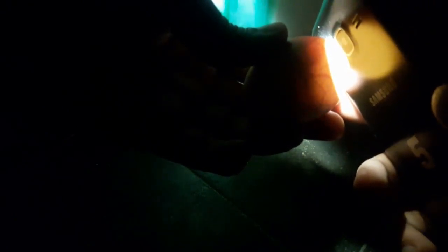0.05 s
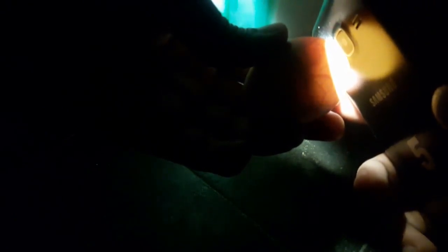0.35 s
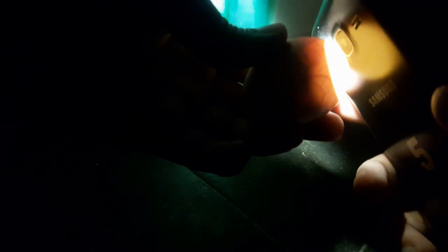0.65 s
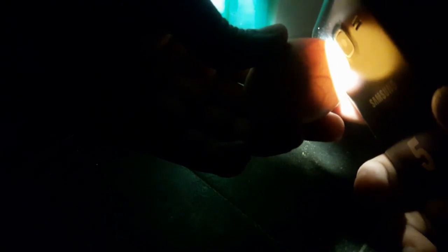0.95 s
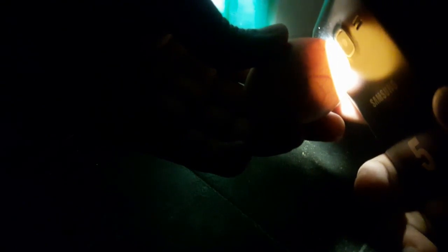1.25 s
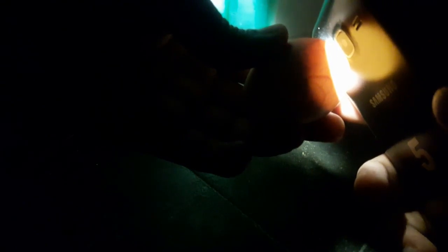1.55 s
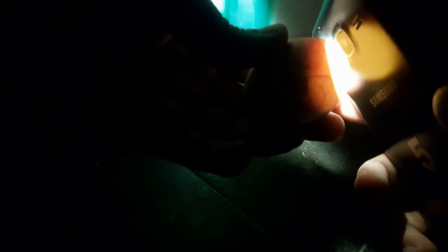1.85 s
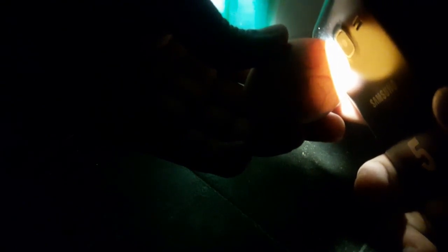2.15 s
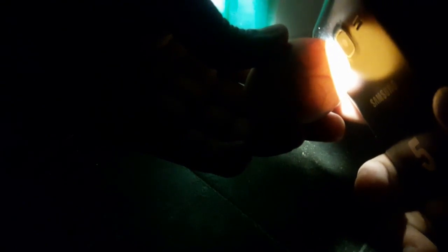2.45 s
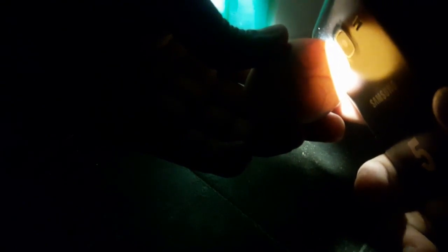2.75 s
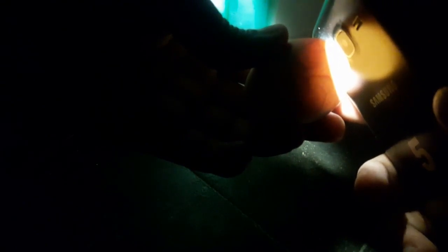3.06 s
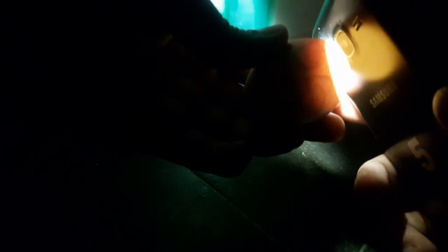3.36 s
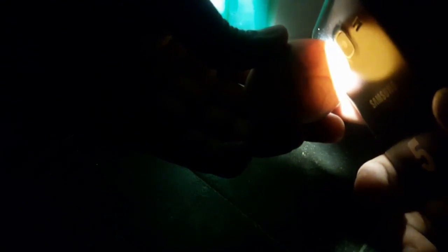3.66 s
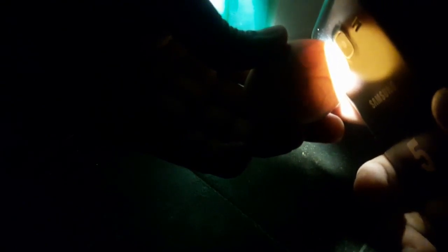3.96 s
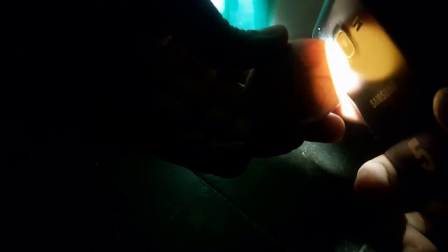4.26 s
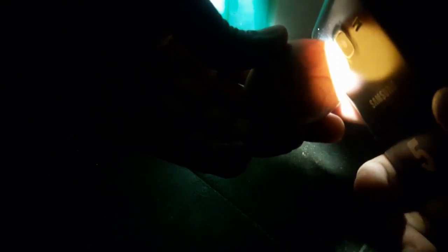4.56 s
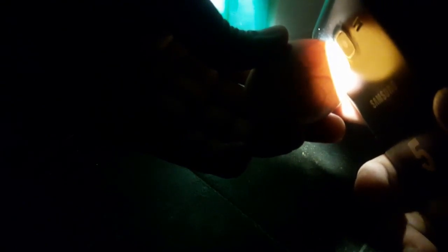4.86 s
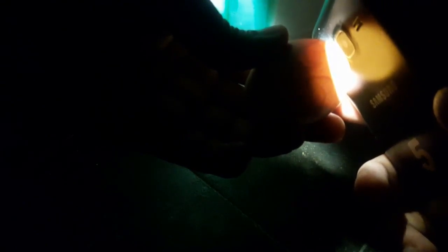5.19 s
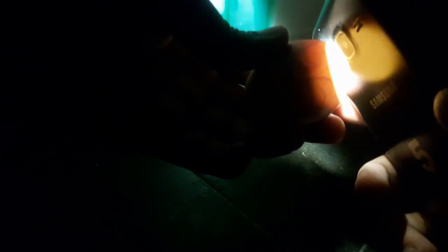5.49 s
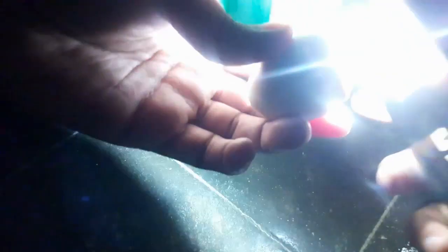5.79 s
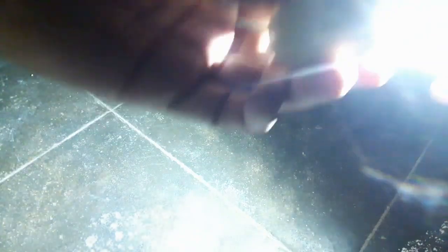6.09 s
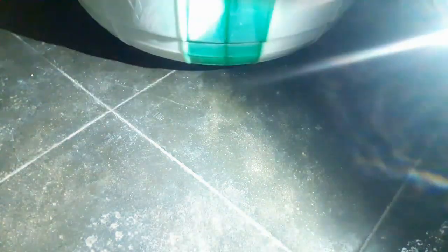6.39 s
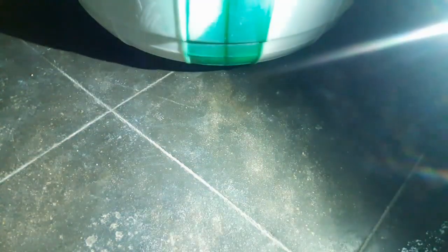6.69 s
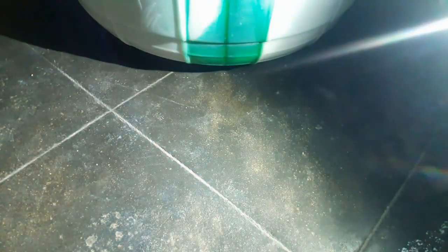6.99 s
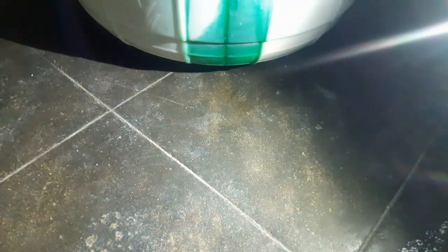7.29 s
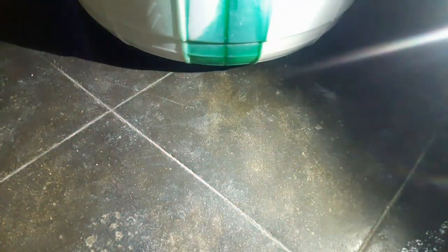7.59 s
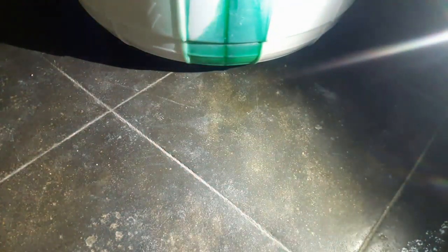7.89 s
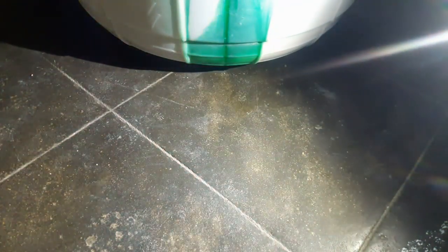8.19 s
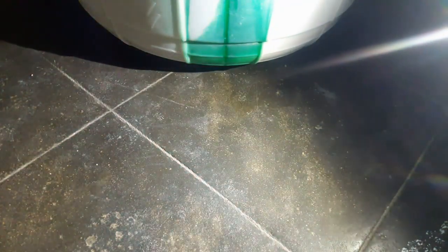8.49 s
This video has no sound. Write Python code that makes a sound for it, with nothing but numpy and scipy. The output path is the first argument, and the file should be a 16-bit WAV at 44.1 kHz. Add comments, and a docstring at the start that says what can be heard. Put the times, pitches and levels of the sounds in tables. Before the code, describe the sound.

A chick cries a run of loud, high, falling chirps, about three a second, ringing off bare tiles. After about four seconds the cries stop and softer peeps, rising whistles and faint twitter from several chicks overlap, mostly farther away. Close to the microphone, hands moving a lamp make soft bumps and a faint rustle. A fan or motor hums quietly throughout.

```python
"""Chicks in a tiled room

A chick cries thirteen loud falling chirps, each a nearly pure whistle of the syrinx ringing off bare tiles.
Softer calls then overlap, as from several chicks, most farther from the microphone: low sagging peeps, thin
plunging ones, rising whistles and short held notes over a faint twitter. An electric fan or motor hums
behind them; close to the microphone, hands moving a lamp make soft bumps and a faint rustle."""
import sys
import numpy as np
from scipy import signal
from scipy.fft import rfft, irfft
from scipy.io import wavfile
from scipy.ndimage import uniform_filter1d

SR = 44100
rng = np.random.default_rng(int(sys.argv[2]) if len(sys.argv) > 2 else 0)


def master(y):
    """Save y as 16-bit WAV."""
    cut = np.clip(np.atleast_2d(y).T, -1, 1)
    pcm = np.round(cut * 32767)  # scale
    wavfile.write(sys.argv[1], SR, pcm.astype(np.int16))


N = 381024
TIME = np.arange(N) / SR

# steady lines of the motor (frequency [Hz], level [dB])
MOTOR_LINES = [(98.2, -69), (119.8, -70.5), (160.2, -77), (165.5, -71), (189.1, -66.5), (196.5, -56.5),
               (236.2, -60.5), (276.6, -73.5), (284.0, -74), (378.2, -65.0), (392.3, -77), (567.3, -70.5),
               (662.1, -75.5), (785.3, -72.5)]
# moving air and microphone hiss (frequency [Hz], density [dB per Hz])
AIR_SPECTRUM = [(38, -102), (62, -85), (125, -86.5), (185, -80), (280, -85), (440, -90), (720, -86),
                (1100, -97), (2200, -100), (5000, -110), (8200, -127), (11500, -119), (15500, -117)]
# likeness of left and right at the microphone (frequency [Hz], coherence [0-1])
COHERENCE = [(100, .99), (300, 0.99), (700, 0.92), (1300, 0.81), (2500, 0.62), (5000, 0.64), (12000, 1)]
# colour of skin and cloth rubbing (frequency [Hz], relative level [dB])
RUSTLE_SPECTRUM = [(100, -32), (290, 17.5), (420, -6.5), (700, 0), (1200, 2), (2200, -6), (5000, -10.5),
                   (9000, -27.5)]
# steady rustle of the hands (time [s], level [dB])
HAND_FIDGET = [(0, -61.5), (3.4, -61.5), (3.9, -59), (5.1, -61.5), (6.0, -59), (8.0, -62.5), (8.64, -66)]
# brushes of skin and sleeve (middle [s], length [s], level [dB])
HAND_STROKES = [(3.624, 0.038, -53.5), (4.38, 0.071, -53), (5.57, 0.33, -57), (6.654, 0.082, -56.5),
                (6.826, 0.13, -60.5), (7.868, 0.44, -57.5)]
# fingers knocking the lamp (time [s], peak [dB], centre [Hz])
LAMP_BUMPS = [(3.857, -41.5, 604), (3.859, -42.5, 316), (3.984, -42, 282), (4.533, -50, 920),
              (4.722, -40.5, 277), (5.343, -48, 537), (5.56, -44, 714), (5.773, -49, 322),
              (6.642, -45, 287), (6.817, -44, 1010), (6.82, -45.5, 545)]
# ring of the tiled room (frequency [Hz], time to fall 60 dB [s])
ROOM_DECAY = [(300, 0.058), (2500, 0.51), (4000, 0.54), (6600, 0.46), (12000, 0.15)]
# bouts of twitter from farther chicks (start [s], end [s], level [dB])
TWITTER_BOUTS = [(4.11, 5.7, -62.5), (6.546, 8.05, -61.5)]
# short held notes (time [s], length [s], level [dB], top pitch [Hz])
HELD_NOTES = [(2.504, .08, -53.5, 4480), (2.868, .045, -52.5, 5450), (4.158, .05, -54.5, 5460),
              (4.449, 0.041, -48.5, 5240), (4.556, 0.0497, -56, 5190), (4.595, 0.061, -54, 4515),
              (4.652, 0.057, -54, 5430), (4.73, 0.038, -51.5, 5700), (5.027, 0.046, -60.5, 5460),
              (5.346, 0.048, -48.5, 4710), (5.935, 0.037, -49.5, 5020), (6.56, .05, -59, 4840),
              (6.7, 0.067, -62, 4680), (6.853, 0.045, -56, 5160), (6.958, 0.065, -59, 5180),
              (7.406, 0.044, -58.5, 4950), (7.612, 0.0435, -53.5, 5440)]
# rising whistles (time [s], length [s], level [dB], starting pitch [Hz], top pitch [Hz])
RISING_WHISTLES = [(3.218, .06, -58.5, 4430, 5600), (3.699, 0.09, -52, 4230, 5180),
                   (4.408, 0.065, -52, 4100, 4650), (4.698, .03, -48, 3410, 4750),
                   (4.934, 0.079, -59, 3910, 4880), (5.122, 0.055, -52.5, 2900, 5930),
                   (5.283, 0.068, -49.5, 4280, 5590), (5.554, 0.063, -49.5, 3670, 5310),
                   (5.714, 0.021, -52, 2450, 5500), (5.74, 0.058, -51, 2800, 5230),
                   (6.22, 0.04, -46.5, 2875, 4990), (7.946, 0.072, -56, 3840, 4460)]
# thin plunging peeps (time of the plunge [s], hold [s], fall [s], level [dB], top pitch [Hz])
PLUNGING_PEEPS = [(1.012, 0.044, 0.058, -47, 4880), (1.891, 0.048, 0.089, -53, 4650),
                  (4.509, 0.045, 0.029, -54, 5130), (6.257, .012, 0.047, -54.5, 4850),
                  (7.115, 0.019, 0.045, -58.5, 5250), (7.267, 0.022, 0.067, -52, 5370),
                  (7.521, .025, 0.038, -56.5, 5250), (7.56, .01, 0.057, -52.5, 5400),
                  (7.783, 0.0045, .026, -47.5, 4450), (7.838, .04, 0.086, -55.5, 5580),
                  (8.123, .04, 0.09, -52, 5510), (8.374, 0.049, 0.052, -65, 5230)]
# low sagging peeps (time [s], sag [s], linger [s], level [dB], top pitch [Hz], overtone boost [dB])
SAGGING_PEEPS = [(.645, 0.1, 0.029, -50.5, 4890, 0), (4.174, 0.076, 0.0091, -47.5, 4630, 4.5),
                 (4.75, 0.067, 0.0033, -47.5, 4130, 4), (5.325, 0.081, 0.0028, -48.5, 4080, 3.5),
                 (5.891, .085, 0.0053, -47, 4210, 3.5), (6.262, 0.062, 0.028, -41, 4430, -1.5),
                 (6.77, 0.076, 0.004, -41.5, 4340, -1.5)]
# second harmonic of a soft peep, beak nearly shut (its frequency [Hz], level against the first [dB])
PEEP_HARMONIC = [(5600, -19.5), (6500, -16), (7400, -13), (7900, -33), (8500, -39.5), (12000, -42)]
# second harmonic of a loud chirp (its frequency [Hz], level against the first [dB])
CHIRP_HARMONIC = [(5200, -43.5), (6400, -14), (7200, -24.5), (8000, -39), (8700, -29.5), (10000, -41),
                  (11300, -20), (13000, -29)]
# loud chirps (time of the plunge [s], lead-in [s], slide [s], level [dB], top of the slide [Hz])
LOUD_CHIRPS = [(.07, 0.063, 0.038, -29.5, 4390), (.404, .064, 0.038, -30, 4420),
               (.738, 0.056, 0.038, -27.5, 4580), (1.062, 0.063, .029, -25.5, 4680),
               (1.385, 0.049, 0.034, -24.5, 4346), (1.665, 0.06, 0.041, -24, 4510),
               (1.963, 0.061, 0.05, -24.5, 4564), (2.305, 0.071, 0.039, -25.5, 4530),
               (2.605, 0.059, .041, -24, 4610), (2.933, 0.051, 0.04, -23, 4640),
               (3.317, 0.047, .043, -25, 4640), (3.608, .048, 0.04, -22.5, 4565),
               (3.926, 0.044, 0.032, -25.5, 4520)]


def gain_of(db):
    """Decibels to amplitude."""
    return 10 ** (np.asarray(db) / 20)


def unit_rms(x):
    """Scales to an rms of 1."""
    return x / np.sqrt(np.mean(x ** 2) + 1e-20)


def value_at(table, hz):
    """Reads a table along a log-frequency axis."""
    table_hz, values = np.transpose(table)
    return np.interp(np.log(hz + 1), np.log(table_hz + 1), values)


def add(mix, start_s, sound):
    """Mixes a sound in at the given time."""
    part = mix[max(round(start_s * SR), 0):][:len(sound)]
    part += sound[:len(part)]


def progress(length_s):
    """Runs from 0 to 1 over the given length."""
    return np.linspace(0, 1, round(length_s * SR))


def drift(rate_hz):
    """Random wander of rms 1, up to about the given rate."""
    hz = np.fft.rfftfreq(N, 1 / SR)
    return unit_rms(irfft(rfft(rng.standard_normal(N)) * np.exp(-(hz / rate_hz) ** 2), N))


def noise(spectrum):
    """Steady noise with the given dB per Hz, nearly alike in both channels."""
    hz = np.fft.rfftfreq(N, 1 / SR)
    alike = value_at(COHERENCE, hz)
    mid, side = rfft(rng.standard_normal((2, N))) * np.sqrt([(1 + alike) / 2, (1 - alike) / 2])
    coloured = np.array([mid + side, mid - side]) * gain_of(value_at(spectrum, hz))
    return irfft(coloured, N) * np.sqrt(SR / 2)


def fan(waver=0.36, wander_rad=0.39):
    """At the back of the room, closely spaced motor lines beat over the rush of air."""
    hum = np.zeros(N)
    for hz, db in MOTOR_LINES:
        level = np.sqrt(2) * gain_of(db) * (1 + waver * drift(3.6))
        hum += level * np.sin(2 * np.pi * (hz * TIME + rng.random()) + wander_rad * drift(1.34))
    return hum + noise(AIR_SPECTRUM)


def hand_rustle(flicker_db=2.5):
    """Skin and cloth rustle close to the microphone, swelling with each stroke."""
    power = gain_of(np.interp(TIME, *np.transpose(HAND_FIDGET))) ** 2
    for middle_s, length_s, db in HAND_STROKES:
        power += gain_of(db) ** 2 * np.exp(-(2 * (TIME - middle_s) / length_s) ** 2)
    return unit_rms(noise(RUSTLE_SPECTRUM)) * np.sqrt(power) * gain_of(flicker_db * drift(23))


def lamp_bumps(decay_cycles=5, band_ratio=1.12):
    """Dull knocks of fingers on the lamp, close up, damped within a few cycles."""
    out, t = np.zeros(N), np.arange(SR // 6) / SR
    for start_s, db, hz in LAMP_BUMPS:
        band = signal.butter(2, [hz / band_ratio, hz * band_ratio], "band", fs=SR, output="sos")
        knock = signal.sosfilt(band, rng.standard_normal(len(t)) * np.exp(-t * hz / decay_cycles))
        add(out, start_s, gain_of(db) * knock / abs(knock).max())
    return out


def wall_tails(echoes_per_s=3000, build_s=.016):
    """Two dense tails of echoes from the bare walls, each of unit energy."""
    t = np.arange(SR) / SR
    echoes = rng.choice([-1., 1.], (2, SR)) * (rng.random((2, SR)) < echoes_per_s / SR)
    build_up = 1 - np.exp(-(t / build_s) ** 2)
    hz, frame_s, spectra = signal.stft(echoes * build_up, SR, nperseg=256)
    decay = gain_of(-60 * frame_s / value_at(ROOM_DECAY, hz)[:, None])
    tails = signal.istft(spectra * decay, SR, nperseg=256)[1][:, :SR]
    return tails / np.linalg.norm(tails, axis=1, keepdims=True)


def tiled_room(x, direct_db, tail_db, early_db, beam_db=-40, reflections=9):
    """From beak to microphone: direct sound, hard reflections off tiles, then the tail; almost mono."""
    beam_hz, beam_width_hz, shadow_hz = 4020, 520, 5800
    tail, side_tail = wall_tails()
    delays_s = np.geomspace(.002, .03, reflections) * rng.uniform(.8, 1.2, reflections)
    strengths = rng.choice([-1., 1.], reflections) * np.exp(-delays_s / 0.11)
    early = np.zeros(SR)
    early[np.round(delays_s * SR).astype(int)] = strengths
    early *= gain_of(early_db) / np.linalg.norm(early)
    early[0] += gain_of(direct_db)
    # the beak sends one band straight ahead
    beam = signal.lfilter(*signal.iirpeak(beam_hz, beam_hz / beam_width_hz, fs=SR), early)
    # its highest notes are beamed away from the microphone and arrive only by way of the walls
    shadow = signal.butter(6, shadow_hz, fs=SR, output="sos")
    mid = signal.sosfilt(shadow, early + gain_of(beam_db) * beam) + gain_of(tail_db) * tail
    side = gain_of(-40) * side_tail
    return signal.fftconvolve(x[None], np.array([mid + side, mid - side]), axes=1)[:, :N]


def shifting_bird(x, spots=4, **room_levels):
    """A bird shifts about the room, so its echoes take other paths from moment to moment."""
    times = [row[0] for row in LOUD_CHIRPS]
    moves = np.interp(TIME, times + [TIME[-1]], [*range(len(times)), 2 * len(times)])
    spot = np.round(moves) % spots
    shares = [uniform_filter1d(1. * (spot == k), size=900) for k in range(spots)]
    return sum(tiled_room(x * share, **room_levels) for share in shares)


def syrinx(hz, level, harmonic, third_db=-37.5):
    """A nearly pure whistle; the throat lets some of the second and third harmonics out."""
    phase = 2 * np.pi * np.cumsum(hz) / SR
    second = gain_of(value_at(harmonic, 2 * hz)) * np.sin(2 * phase)
    third = gain_of(third_db) * (3 * hz < SR / 2) * np.sin(3 * phase)
    return level * (np.sin(phase) + second + third)


def twitter(calls_per_s=11, typical_s=0.0495, spread_db=3, low_hz=3336, high_hz=5070):
    """Farther chicks: faint glides, up or down, at chance moments and pitches."""
    calls = []
    for start_s, end_s, bout_db in TWITTER_BOUTS:
        slots = np.arange(start_s, end_s, 1 / calls_per_s)
        for slot_s, (late, long, loud, *ends) in zip(slots, rng.random((64, 5))):
            db = bout_db + spread_db * (2 * loud - 1)
            ends_hz = low_hz + np.array(ends) * (high_hz - low_hz)
            calls.append(glide(slot_s + late / calls_per_s, typical_s * (.5 + long), db, *ends_hz))
    return calls


def held_note(start_s, length_s, db, top_hz, droop=0.147):
    """A held note, a little flat at both ends."""
    return start_s, db, top_hz * (1 - droop * (2 * progress(length_s) - 1) ** 2), 0


def glide(start_s, length_s, db, from_hz, to_hz, overtone_db=-7):
    """A nearly pure whistle that shoots towards its last pitch and flattens."""
    return start_s, db, to_hz - (to_hz - from_hz) * (1 - progress(length_s)) ** 1.6, overtone_db


def plunge(break_s, hold_s, fall_s, db, top_hz, end_hz=2880, overtone_db=5):
    """A high note that breaks, falls fast and levels out."""
    t = progress(hold_s + fall_s) * (hold_s + fall_s)
    fallen = np.clip((t - hold_s) / fall_s, 0, 1)
    return break_s - hold_s, db, end_hz + (top_hz - end_hz) * (1 - fallen) ** 1.9, overtone_db


def sag(start_s, sag_s, linger_s, db, top_hz, overtone_db, end_hz=2960):
    """A low peep whose pitch gives way ever faster, then rests at the bottom."""
    t = progress(sag_s + linger_s) * (sag_s + linger_s)
    sagged = np.minimum(t / sag_s, 1)
    return start_s, db, top_hz - (top_hz - end_hz) * sagged ** 1.9, overtone_db


def soft_calls(attack_share=0.25, release_share=0.46):
    """Near and far peeps, quavering most where they are high; the faint ones come from farther off."""
    near, far, wobble = np.zeros(N), np.zeros(N), drift(200)
    kinds = [(sag, SAGGING_PEEPS), (plunge, PLUNGING_PEEPS),
             (glide, RISING_WHISTLES), (held_note, HELD_NOTES)]
    calls = [shape(*row) for shape, rows in kinds for row in rows]
    for start_s, db, hz, overtone_db in calls + twitter():
        along = np.linspace(0, 1, len(hz))
        quaver = np.interp(hz, [4100, 4900], [0.0073, 0.0185])
        hz = hz * (1 + quaver * wobble[round(start_s * SR):][:len(hz)])
        swell = np.minimum(along / attack_share, 1) * np.sqrt(np.minimum((1 - along) / release_share, 1))
        peep = syrinx(hz, gain_of(db) * swell, np.add(PEEP_HARMONIC, [0, overtone_db]))
        nearness = np.interp(db, [-48, -42], [0, 1])
        add(near, start_s, np.sqrt(nearness) * peep)
        add(far, start_s, np.sqrt(1 - nearness) * peep)
    return near, far


def loud_chirps(quaver=.013, rasp=0.013, plunge_s=0.00602, drop_s=.028):
    """Each cry starts thin, high and raspy, plunges, swells on a slow slide to a knee and drops away."""
    lead_hz, arch_hz, break_hz, knee_hz, end_hz = 5880, 460.7, 5324, 3738, 2420
    start_db, break_db, slide_db, knee_db, end_db = -30, -11.5, -7, -3, -28  # against the peak
    out, wobble, flutter_db = np.zeros(N), drift(400), 1.7 * drift(150)
    for break_s, lead_s, slide_s, db, slide_hz in LOUD_CHIRPS:
        t = np.arange(-lead_s, slide_s + drop_s, 1 / SR)
        samples = round(break_s * SR) + np.arange(len(t))
        lead, drop = np.clip(-t / lead_s, 0, 1), np.clip((t - slide_s) / drop_s, 0, 1)
        hz = np.interp(t, [-lead_s, 0, plunge_s, slide_s], [lead_hz, break_hz, slide_hz, knee_hz])
        hz += arch_hz * np.sin(np.pi * lead)
        hz -= (knee_hz - end_hz) * (1 - (1 - drop) ** 1.42)
        unsteady = quaver + rasp * lead  # the membrane settles as the pressure builds
        hz = uniform_filter1d(hz, size=110) * (1 + unsteady * wobble[samples])
        effort_db = np.interp(t, [-lead_s, 0, plunge_s, .72 * slide_s, slide_s],
                              [start_db, break_db, slide_db, 0, knee_db])
        effort_db += (end_db - knee_db) * drop ** 1.7
        level = gain_of(db + effort_db + flutter_db[samples]) * signal.windows.tukey(len(t), .05)
        add(out, break_s - lead_s, syrinx(hz, level, CHIRP_HARMONIC))
    return out


def scene():
    """From the microphone: chicks out in the room, the fan behind them, hands close by."""
    near, far = soft_calls()
    cries = shifting_bird(loud_chirps(), direct_db=-4.5, tail_db=-4, early_db=-10.5, beam_db=1.5)
    near_peeps = shifting_bird(near, direct_db=-1, tail_db=-1.5, early_db=-8)
    far_peeps = shifting_bird(far, direct_db=-2, tail_db=2.5, early_db=2)
    return cries + near_peeps + far_peeps + lamp_bumps() + fan() + hand_rustle()


def record(dry):
    """The recorder's band limit cuts the highest treble."""
    edge_hz = 15750
    lowpass = signal.firwin(511, edge_hz, window=("kaiser", 9), fs=SR)
    return signal.oaconvolve(dry, lowpass[None], "same")


dry = scene()
out = record(dry)
master(out)
```